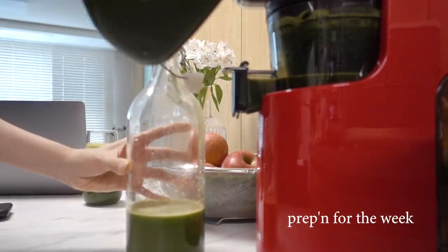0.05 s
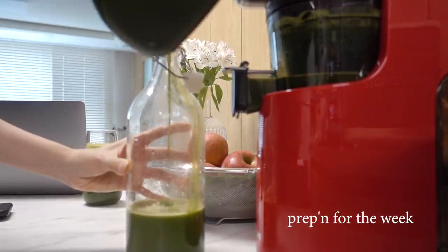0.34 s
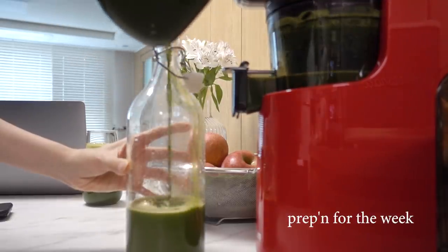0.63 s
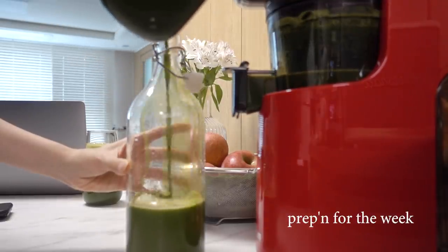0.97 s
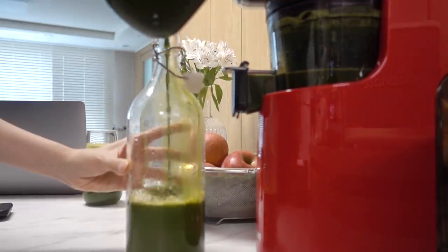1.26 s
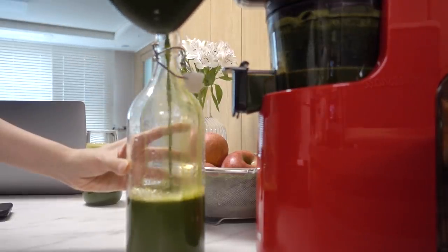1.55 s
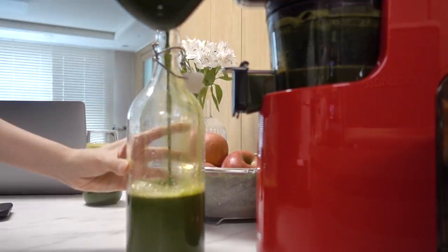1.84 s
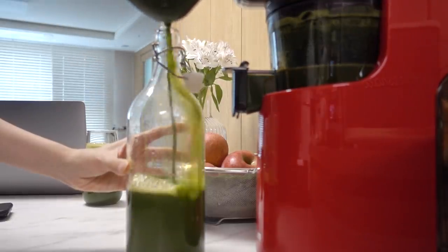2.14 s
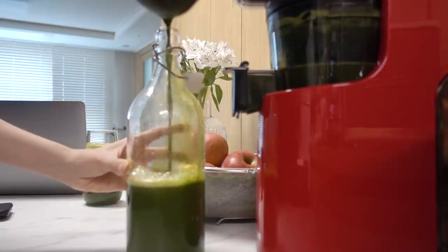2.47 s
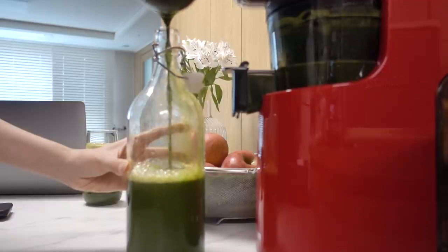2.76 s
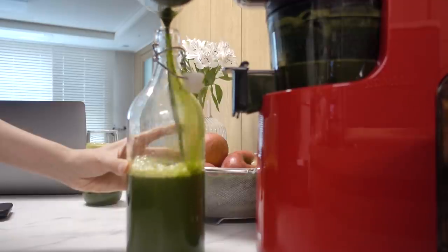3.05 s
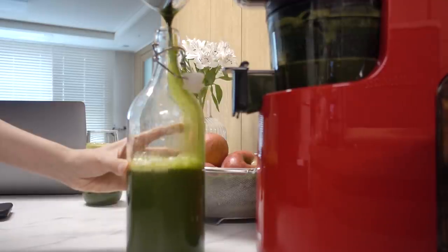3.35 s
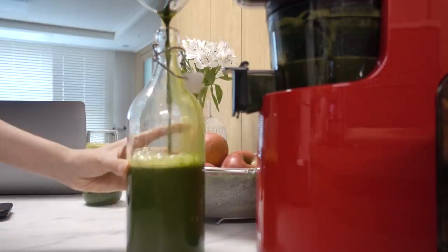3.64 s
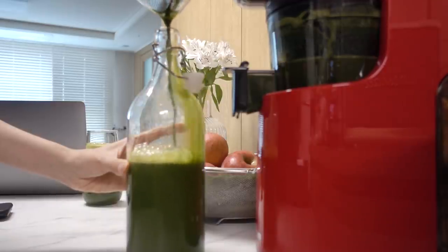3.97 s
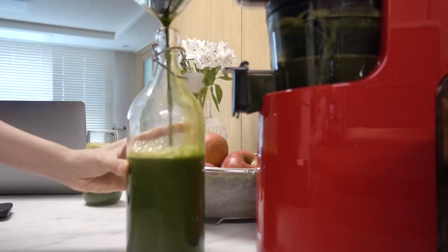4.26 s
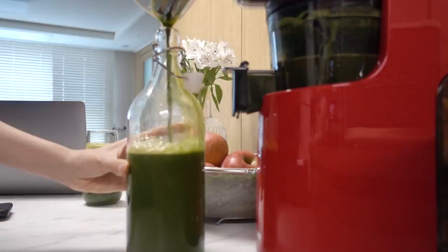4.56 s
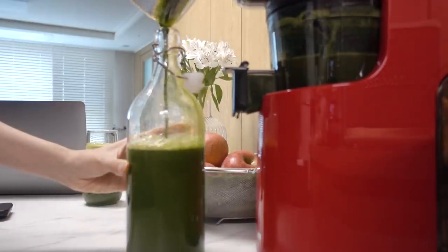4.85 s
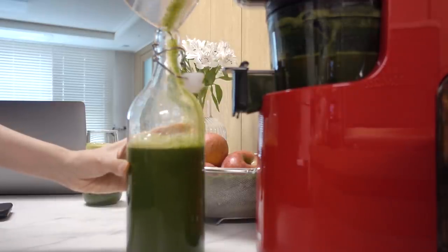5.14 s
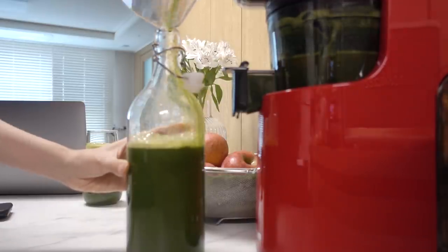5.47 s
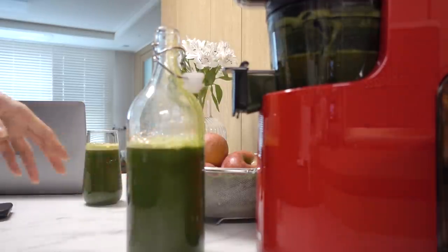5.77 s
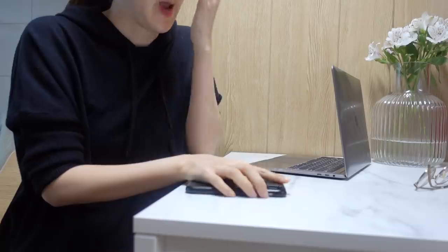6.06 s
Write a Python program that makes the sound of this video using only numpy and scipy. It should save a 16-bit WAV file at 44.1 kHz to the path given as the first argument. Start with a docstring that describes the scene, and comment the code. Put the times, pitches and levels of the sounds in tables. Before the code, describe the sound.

Wet crunching and sharp little snaps come right from the start as a slow juicer crushes leaves and fruit on a kitchen counter, close to the microphone and centred. Small squelches, fine spits of juice and a few dull knocks mix in, over a steady hiss and a motor whine that sags slightly under load. After almost six seconds the sound stops dead, and a faint low bump fades into room tone.

```python
"""Wet, crunching crackle over the buzz and whine of a motor: a slow juicer on a kitchen counter.
The auger grinds leaves and fruit into dense grains that ring the plastic bowl; stalks snap against
the strainer, air pockets squelch out of the pulp, juice spits and hard chunks thud in the housing.
The mains motor sags under the bites, and its cooling air hisses evenly.
Near the end the sound cuts off abruptly, leaving a soft low bump in a quiet room."""
import sys
import numpy as np
from scipy import signal
from scipy.fft import rfft, irfft, next_fast_len
from scipy.io import wavfile
from scipy.ndimage import uniform_filter1d

SR = 44100
rng = np.random.default_rng(int(sys.argv[2]) if len(sys.argv) > 2 else 0)


def store_pcm(level_fs):
    """Save levels as 16-bit WAV."""
    pcm = np.round(np.clip(level_fs, -1, 1) * 32767).astype(np.int16)
    wavfile.write(sys.argv[1], SR, np.atleast_2d(pcm).T)


N = 269454
TIME = np.arange(N) / SR
CUT_S, MAINS_HZ = 5.912, 59.98

# The auger bites into produce. Each row: start in seconds, length in seconds,
# relative level of crushed pulp in dB, relative level of torn leaves in dB.
AUGER_BITES = [(0.08, 0.086, -62, -53), (0.335, 0.15, -43, -46), (0.535, 0.13, -44.5, -47.5),
               (0.761, 0.096, -43, -48), (1.227, 0.022, -45, -46), (1.278, 0.05, -40, -44),
               (1.419, 0.1, -45.5, -51.5), (1.618, 0.018, -37.5, -38.5), (1.911, 0.061, -41.5, -45),
               (2.01, 0.039, -42.5, -39.5), (2.12, 0.025, -47, -43), (2.245, 0.1, -43, -48.5),
               (2.617, 0.1, -45, -53.5), (2.677, 0.1, -52, -56), (2.881, 0.068, -43, -51),
               (3.013, 0.039, -56, -43.5), (3.2, 0.042, -47, -47), (3.28, 0.049, -42, -66),
               (3.459, 0.074, -45.5, -49), (3.587, 0.11, -43, -47), (3.766, 0.052, -52, -47.5),
               (3.889, 0.033, -47, -60), (4.118, 0.14, -48, -49), (4.25, 0.027, -43, -48),
               (4.381, 0.057, -43, -48), (4.566, 0.028, -40, -45), (4.644, 0.02, -38.5, -45),
               (4.74, 0.14, -51.5, -59), (4.905, 0.023, -46, -49), (5.021, 0.04, -49, -53),
               (5.231, 0.018, -52, -41), (5.304, 0.034, -64, -45), (5.44, 0.1, -49, -50.5)]
# The loudest stalks and fruit breaking. Each row: start in seconds, snap level in dB,
# snap centre in Hz, relative knock level in dB, knock centre in Hz.
LOUD_CRACKS = [(0.045, -38.5, 5000, -45, 1400), (0.075, -52, 3830, -33.5, 1400),
               (0.087, -47, 5000, -34.5, 1610), (0.147, -35, 4840, -40, 2330),
               (0.196, -36.5, 4800, -58, 960), (0.293, -34.5, 5740, -47, 2230),
               (0.341, -47, 5000, -39, 1360), (0.374, -41.5, 4920, -40, 1300),
               (0.464, -33, 5100, -34, 2150), (0.484, -31, 5100, -35, 2365),
               (0.505, -35.5, 5000, -47, 2300), (0.527, -46, 5000, -36, 2270),
               (0.538, -35.5, 8540, -50, 2200), (0.547, -38, 5200, -50, 1000),
               (0.576, -41, 5000, -48, 1400), (0.76, -34.5, 11300, -42, 1350),
               (0.769, -37, 5000, -45, 1403), (0.79, -40, 4900, -48, 2400), (0.814, -38, 5000, -39, 1020),
               (0.855, -38, 4820, -40, 1430), (0.872, -36, 4990, -50, 1400), (0.946, -35, 5840, -43, 1339),
               (1.031, -34.5, 6900, -43, 2410), (1.124, -51, 5040, -37, 974),
               (1.227, -34.5, 6820, -55, 1555), (1.243, -47, 4500, -34.5, 2530),
               (1.274, -37, 4970, -44, 1000), (1.291, -39, 4886, -37, 1100), (1.297, -33, 3840, -34, 1390),
               (1.319, -45, 4980, -40, 1030), (1.373, -45, 5000, -36, 1350), (1.445, -48, 4980, -39, 1020),
               (1.459, -34.5, 4930, -52, 1552), (1.556, -36.5, 4960, -42, 1606),
               (1.629, -40, 5260, -43, 1500), (1.636, -38, 5260, -32.5, 1002),
               (1.713, -38.5, 6100, -45, 1403), (1.908, -37, 5980, -34, 1599),
               (1.937, -42, 5190, -39, 1506), (1.965, -36, 4484, -38, 1370), (1.971, -42, 5540, -33, 1980),
               (2.013, -32.5, 4690, -36, 1406), (2.017, -39, 4800, -33, 1390),
               (2.026, -35, 5070, -46, 2300), (2.033, -35, 5010, -45, 969), (2.053, -39, 7400, -35.5, 1023),
               (2.122, -32, 5000, -35, 2420), (2.131, -35, 5170, -42, 1091),
               (2.195, -37.5, 6530, -59, 1400), (2.251, -38, 5020, -38, 1005),
               (2.263, -39, 7000, -48, 1403), (2.272, -37.5, 6990, -46, 1500),
               (2.446, -48, 10970, -34.5, 995), (2.459, -36, 6210, -43, 990), (2.54, -59, 3964, -39, 1258),
               (2.627, -56, 4493, -36.5, 1780), (2.689, -46, 3790, -35, 2180),
               (2.721, -38, 8950, -40, 1027), (2.758, -36.5, 5075, -37, 2500),
               (2.894, -43, 4993, -36.5, 1080), (2.926, -39, 5980, -45, 1407),
               (3.034, -35, 5000, -33.5, 2260), (3.047, -42, 5200, -46, 1400),
               (3.133, -38.5, 6020, -55, 1394), (3.211, -40, 5010, -46, 1397),
               (3.373, -38.5, 5500, -43, 2182), (3.384, -48, 6810, -32.5, 2260),
               (3.488, -34.5, 8050, -50, 2215), (3.517, -34.5, 5810, -40, 2280),
               (3.54, -39, 7000, -41, 1397), (3.599, -42, 8500, -40, 1390), (3.635, -38, 6990, -38.5, 966),
               (3.667, -34, 3570, -36, 2328), (3.767, -32.5, 4900, -37.5, 2710),
               (3.796, -46, 5000, -39, 2720), (3.82, -43, 6030, -51, 1398), (3.909, -56, 4990, -36, 1597),
               (3.972, -34.5, 4944, -42, 1039), (3.977, -34.5, 4924, -36, 1006),
               (4.144, -39.5, 5000, -44, 1605), (4.195, -47, 5500, -50, 1402),
               (4.231, -37.5, 7140, -51, 1000), (4.241, -48, 5060, -38, 1316),
               (4.266, -43, 5000, -40, 1050), (4.336, -33.5, 6490, -43, 998),
               (4.393, -33.5, 4990, -38, 1582), (4.425, -32, 6980, -38, 1606),
               (4.465, -46, 4983, -37.5, 1000), (4.591, -39, 5000, -37.5, 1013),
               (4.617, -43, 4980, -40, 1997), (4.647, -45, 5000, -38, 2426),
               (4.666, -36, 10710, -37.5, 1050), (4.757, -35.5, 5300, -48, 1091),
               (4.837, -41, 7000, -37, 2400), (4.913, -47, 5000, -37.5, 1095),
               (5.021, -35, 7000, -49, 1147), (5.137, -34.5, 7400, -38.5, 1033),
               (5.237, -34.5, 6730, -34, 1359), (5.246, -39.5, 5020, -38, 1060),
               (5.27, -35.5, 6770, -56, 1400), (5.323, -33.5, 5690, -59, 2700),
               (5.337, -34.5, 6750, -62, 2400), (5.348, -34, 5030, -65, 1410),
               (5.362, -39, 5000, -60, 1400), (5.506, -36, 8180, -53, 941), (5.529, -40, 5970, -54, 1397)]
# The loudest air pockets in the pulp. Each row: start in seconds, pitch in Hz, relative level in dB.
LOUD_SQUELCHES = [(0.079, 1660, -34.5), (0.338, 1300, -34), (0.494, 2320, -34), (1.292, 1060, -33.5),
                  (1.63, 1520, -35), (0.694, 1043, -36), (1.038, 1050, -44), (1.604, 1000, -36),
                  (1.734, 1050, -37), (2.957, 1050, -42), (3.99, 1000, -41), (4.81, 1080, -42),
                  (2.049, 1020, -36.5), (2.715, 994, -37), (3.224, 1880, -38.5), (3.31, 2204, -45),
                  (3.377, 2270, -39), (3.51, 2247, -34.5), (3.907, 1590, -35.5), (4.264, 1017, -34.5),
                  (4.585, 1050, -43), (4.915, 2060, -41), (5.234, 1370, -40), (5.78, 1510, -40)]
# Juice spitting through the strainer. Each row: start in seconds, level in dB.
JUICE_SPITS = [(0.132, -49), (0.376, -41), (0.422, -43), (0.446, -41), (0.768, -38.5), (1.29, -39),
               (1.318, -40), (1.598, -44), (1.629, -37.5), (1.936, -38), (1.965, -44), (2.013, -42),
               (2.29, -41.5), (2.72, -38.5), (2.89, -43), (3.158, -42.5), (3.215, -42), (3.486, -43),
               (3.598, -41), (3.634, -40), (4.655, -41), (4.834, -42), (5.235, -40.5), (5.454, -42.5),
               (5.49, -43.5), (5.788, -41), (5.873, -42)]
# Hard chunks shifting against the auger. Each row: start in seconds, level in dB.
CHUNK_THUDS = [(0.088, -54), (1.295, -63), (1.636, -58), (2.252, -59), (2.446, -48), (2.54, -49),
               (3.035, -54), (3.385, -53), (3.636, -48), (5.24, -49.5)]
# The motor sagging and picking up again. Each row: time in seconds, shaft turns per second.
SHAFT_SPEEDS = [(0.02, 228.9), (0.1, 229.4), (0.15, 229.4), (0.24, 228.4), (0.3, 226.7), (0.39, 227.7),
                (0.48, 225), (0.75, 225.4), (0.81, 222.4), (0.96, 227.6), (1.12, 227.2), (1.21, 225.1),
                (1.25, 223.4), (1.35, 222.7), (1.42, 225.8), (1.47, 223.7), (1.69, 229.1), (1.89, 226.5),
                (2.13, 222.9), (2.53, 226.8), (2.62, 227), (2.76, 222), (2.92, 227.3), (3.05, 221.6),
                (3.21, 226.9), (3.35, 222.1), (3.44, 226.3), (3.48, 221.7), (3.58, 225), (3.65, 220.4),
                (3.71, 224.2), (3.79, 221), (3.85, 226.6), (3.97, 221.6), (4.06, 226.7), (4.16, 225.2),
                (4.24, 223.4), (4.33, 224.1), (4.43, 219.7), (4.49, 225.3), (4.54, 226.3), (4.58, 222.6),
                (4.76, 222), (4.87, 226.8), (4.94, 222.3), (5.18, 228.6), (5.27, 224.2), (5.48, 226.7),
                (5.55, 223.8), (5.69, 227.4), (5.82, 228), (5.9, 227.2)]
# The whine: the partials at or near whole multiples of the shaft rate (1, 6, 12, 18, 24, 30, 36) # are fan and
# commutator, the others gears and bearings. # Each row: multiple of the shaft rate, level in dB, dB gained per
# Hz of shaft speed, # dB gained per second, phase flutter at average speed in radians.
WHINE_PARTIALS = [(0.994, -67.5, 0, -0.4, 0.34), (4.573, -59, -0.5, -1, 0.46), (6, -58, 1, -0.5, 0.3),
                  (7.07, -63.5, 0.5, -1.5, 0.27), (10.79, -62.5, -1.5, -1, 0.28),
                  (12.06, -64.5, 0.7, 1.8, .6), (15.815, -55.5, -0.5, 0.4, .8),
                  (18.13, -61, 0.6, -0.5, .25), (22.1, -61.5, -1, -0.5, 0.27), (24.2, -61.5, 1.35, 0.5, .2),
                  (30, -62, 0.6, 2.5, .2), (36.02, -53.5, 0.86, -0.16, .2)]
# The motor's magnetic buzz. Each row: multiple of the mains frequency, level in dB.
BUZZ_HARMONICS = [(16, -61.5), (24, -57.5), (32, -70), (40, -56.5), (48, -72), (56, -56.3)]
# The broad tone of the plastic bowl and housing. Each row: frequency in Hz, gain in dB.
BOWL_EQ = [(30, -39), (70, -26), (150, -24), (210, -15.5), (280, -9.5), (440, -12.5), (510, -9),
           (780, -10.5), (950, -0.2), (1200, -2), (1800, -4), (2300, 0), (2800, -10.5), (3200, -11),
           (7000, -26)]
# The ring of the bowl and housing. Each row: centre in Hz, width in Hz, boost in dB.
BOWL_RESONANCES = [(297.6, 66, 8.8), (394, 11, 1.9), (560, 71, 5.9), (708, 36, 7.3), (1008, 140, 4.7),
                   (1361, 29, 8.7), (1598, 58, 6.9), (2708, 97, 8.4)]
# The bright tone of tearing fibres. Each row: frequency in Hz, gain in dB.
FIBRE_EQ = [(300, -41), (1500, -17.5), (3000, -6), (3900, -4.5), (4400, -4), (4900, -0.5), (6100, -2),
            (7200, -1), (8500, -2.5), (9500, -5), (11200, -10), (12800, -11), (15500, -9.5)]
# The brief ring of the strainer. Each row: centre in Hz, width in Hz, boost in dB.
STRAINER_RESONANCES = [(4560, 91, 6.5), (4910, 130, 2.7), (5340, 120, 3), (7000, 180, 2.4),
                       (11070, 620, 5.9)]
# The sizzle of juice spray. Each row: frequency in Hz, gain in dB.
SPRAY_EQ = [(2000, -38), (6000, -7), (9500, 2), (12500, -1.5), (15500, -6)]
# The dull tone of a thud through the housing. Each row: frequency in Hz, gain in dB.
HOUSING_EQ = [(40, -38), (130, -16), (250, -1), (420, -2), (600, -1), (900, 2), (1500, -13), (4000, -40)]
# The hiss of the cooling air. Each row: frequency in Hz, gain in dB.
FAN_EQ = [(300, -36), (1500, -27.5), (3000, -4), (4900, -3), (8500, -5.5), (11200, -9), (15500, -15)]
# The room tone. Each row: frequency in Hz, gain in dB.
ROOM_EQ = [(18, -46), (30, -10), (92, -19), (167, -9), (195, -13), (222, 0), (260, -27), (437, -15),
           (485, -17), (1920, -19), (15000, -40)]
# The juicer's stereo width. Each row: frequency in Hz, gain of the side signal in dB.
SIDE_EQ = [(100, -38), (1300, -79), (2400, -22.5), (3800, -10), (6000, -13.5), (9500, -14.5), (12000, -6.5),
           (15000, -4.5)]


def crushing():
    """The auger grinds pulp against the strainer; its grains and an even gear rumble ring the bowl."""
    pulp = 0.72 * grains(per_s=200, spread_db=3.5, cap_db=3.5, decay_s=0.0028, click=0.68)
    pockets = np.zeros(N)
    for centre_hz in np.arange(600, 2900, 280):  # wet pockets collapse in flurries, a pitch per size
        flurry = undb(4 * wander(38))
        pops = grains(per_s=90, spread_db=3, cap_db=5, decay_s=0.0051)
        pockets += flurry * band(pops, centre_hz, width_hz=242)
    idle_db = -49 - 0.5 * (TIME - TIME.mean())  # the pulp thins out as the juice drains
    pressure = auger_pressure(idle_db, [(start, length, db) for start, length, db, _ in AUGER_BITES])
    crunch = (pulp + 0.56 * pockets) * pressure * undb(11)
    gear_eq = [(100, -35), (300, -38), (700, -33), (1200, -36.5), (2500, -44)]
    gears = colour(rng.standard_normal(N), gear_eq)
    return colour(crunch + gears, BOWL_EQ, BOWL_RESONANCES) * undb(-1)


def tearing(pressure):
    """Leaf fibres tear against the strainer in short runs of bright, wet crackle."""
    crackle = 0.8 * grains(per_s=150, spread_db=2.6, cap_db=7.5, decay_s=0.0018, click=0.8)
    for centre_hz in (4650, 7400, 9950, 13100):  # fibres of different thickness
        fibres = grains(per_s=100, spread_db=2, cap_db=8, decay_s=0.0025, click=0.7)
        crackle += 1.03 * band(fibres, centre_hz, width_hz=centre_hz / 4)
    sparkle = grains(per_s=70, spread_db=3, cap_db=9, decay_s=0.001, click=1)
    crackle += 0.9 * band(sparkle, centre_hz=12000, width_hz=6000)
    runs = undb(2 * wander(45))
    return unit_rms(colour(runs * crackle, FIBRE_EQ, STRAINER_RESONANCES)) * pressure * undb(2)


def auger_pressure(idle_db, bites):
    """The crackle's envelope: uneven idle grinding that swells with each bite."""
    idle = undb(idle_db + 2 * wander(28))
    bite_power = sum((undb(db) * bite(start, length)) ** 2 for start, length, db in bites)
    return np.sqrt(idle ** 2 + bite_power)


def bite(start, length, attack_s=0.008, release_s=0.025):
    """The pressure of one bite: a quick rise, a hold, a release."""
    since = np.maximum(TIME - start, 0)
    return (1 - np.exp(-since / attack_s)) * np.exp(-np.maximum(since - length, 0) / release_s)


def cracks():
    """Each break is a sharp snap that rings the strainer and a duller knock that rings the bowl."""
    out = np.zeros(N)
    for start, snap_db, snap_hz, knock_db, knock_hz in LOUD_CRACKS + small_cracks():
        snap = burst(decay_s=0.0015, tail_db=-18, tail_s=0.009)
        snap[0] += 3.8  # the break itself arrives before its reflections
        snap_peaks = [(snap_hz, 1600, 7), (4900, 400, 2), (14000, 7000, -3.5)]  # wet pulp dulls the top
        snap = colour(snap, FIBRE_EQ, STRAINER_RESONANCES + snap_peaks)
        knock = burst(decay_s=0.004, tail_db=-16, tail_s=0.016)
        knock[0] += 5
        knock_peaks = [(knock_hz, 260, 8), (400, 600, -4)]  # too light to move the housing much
        knock = colour(knock, BOWL_EQ, BOWL_RESONANCES + knock_peaks)
        add_hit(out, start, snap, snap_db, over_s=0.004)
        add_hit(out, start, knock, knock_db - 2.5, over_s=0.01)
    return out


def small_cracks():
    """Lesser breaks come at random, more often during a bite; rows as in LOUD_CRACKS."""
    per_s = 7 + 14 * sum(bite(start, length) for start, length, *_ in AUGER_BITES)
    count_due = np.cumsum(per_s) / SR
    draws = rng.random((200, 3))
    levels_db = (-45, -51) + 1.8 * rng.uniform(-1.7, 1.7, (200, 2))
    rows = []
    for k, ((jitter, snap_pitch, knock_pitch), (snap_db, knock_db)) in enumerate(zip(draws, levels_db)):
        if k + jitter < count_due[-1]:
            start = np.interp(k + jitter, count_due, TIME)
            snap_hz = np.interp(snap_pitch, (0, 1), (4900, 8250))
            knock_hz = np.interp(knock_pitch, (0, 1), (970, 2480))
            rows.append((start, snap_db, snap_hz, knock_db, knock_hz))
    return rows


def squelches(scatter_octaves=0.11, ring_s=0.0045):
    """Each air pocket squeezed out of the pulp breaks into five short-lived bubbles around its pitch."""
    out, t = np.zeros(N), TIME[:2048]
    envelope = (1 - np.exp(-t / 0.00088)) * np.exp(-t / ring_s)
    for start, pocket_hz, db in LOUD_SQUELCHES + small_squelches():
        for lag, detune, strength in rng.random((5, 3)):
            bubble_hz = pocket_hz * 2 ** (scatter_octaves * (2 * detune - 1))
            cycles = bubble_hz * (t + 0.53 * t ** 2)  # a slight upward chirp
            bubble = envelope * np.sin(2 * np.pi * cycles)
            add(out, start + 0.018 * lag, undb(db + 0.5) * (0.5 + strength) * bubble)
    return out


def small_squelches(per_s=12):
    """Lesser pockets burst at random times and pitches; rows as in LOUD_SQUELCHES."""
    jitter, pitch = rng.random((120, 2)).T
    starts = (np.arange(120) + jitter) / per_s
    pitches_hz = np.interp(pitch, (0, 1), (1100, 2500))
    levels_db = -49 + 1.5 * rng.uniform(-1.7, 1.7, 120)
    return [(start, hz, db) for start, hz, db in zip(starts, pitches_hz, levels_db) if start < CUT_S]


def spits(ticks_per_s=2500):
    """Juice spits through the strainer: tiny films burst in a fine, bright spray that dies away."""
    out, t = np.zeros(N), TIME[:2048]
    envelope = (1 - np.exp(-t / 0.0018)) * np.exp(-t / 0.008)
    for start, db in JUICE_SPITS:
        ticks = (rng.random(len(t)) < ticks_per_s / SR) * rng.standard_normal(len(t))
        hiss = 0.14 * rng.standard_normal(len(t))
        add_hit(out, start, colour((ticks + hiss) * envelope, SPRAY_EQ), db, over_s=0.008)
    return out


def thuds():
    """Hard chunks shift against the auger and thud through the housing."""
    out = np.zeros(N)
    for start, db in CHUNK_THUDS:
        push = burst(decay_s=0.007, tail_db=-18, tail_s=0.02)
        push[0] += 6
        add_hit(out, start, colour(push, HOUSING_EQ, BOWL_RESONANCES), db, over_s=0.015)
    return out


def motor():
    """A rough, wavering whine that follows the shaft, and a magnetic buzz locked to the mains."""
    tremble_hz = 0.45 * wander(40)  # the auger grips and slips
    shaft_hz = uniform_filter1d(curve(SHAFT_SPEEDS), size=1024) + tremble_hz
    turns = np.cumsum(shaft_hz) / SR
    sag_hz = shaft_hz.mean() - shaft_hz
    strain = undb(sag_hz / 2)  # a labouring motor runs rougher
    out = np.zeros(N)
    for order, db, db_per_hz, db_per_s, flutter_rad in WHINE_PARTIALS:
        flutter = flutter_rad * strain * wander(130)  # play in the bearings smears each partial
        level_db = db - db_per_hz * sag_hz + db_per_s * (TIME - TIME.mean()) + 2.2 * wander(28)
        out += undb(level_db) * np.sin(2 * np.pi * order * turns + flutter)
    for order, db in BUZZ_HARMONICS:
        level_db = db + wander(8)
        phase = 2 * np.pi * (order * MAINS_HZ * TIME + rng.random()) + 0.08 * wander(50)
        out += undb(level_db) * np.sin(phase)
    return np.sqrt(2) * out


def fan():
    """The even hiss of the motor's cooling air."""
    return undb(-49.5) * noise(FAN_EQ)


def quiet_room():
    """Low room tone with a little stereo width, and a soft bump that dies away in it."""
    air = undb(-59) * noise(ROOM_EQ)
    side = undb(-71) * noise(ROOM_EQ)
    bump = noise([(20, -9), (50, 5), (100, -13), (170, 1), (300, 5), (450, 0), (700, -5),
                  (1500, -10), (4000, -36.5)])
    bump_db = curve([(5.88, -80), (5.91, -51), (5.945, -51.5), (5.98, -56.5), (6.06, -66)])
    return np.array([air + side, air - side]) + undb(bump_db) * bump


def grains(per_s, spread_db, cap_db, decay_s, click=0):
    """Tiny random breaks of uneven strength, each a dying puff of noise with an optional click."""
    size_db = np.minimum(spread_db * rng.exponential(size=N), cap_db)
    ticks = (rng.random(N) < per_s / SR) * rng.choice([-1, 1], N) * undb(size_db)
    energy = signal.lfilter([1], [1, -np.exp(-2 / (decay_s * SR))], ticks ** 2 + 1e-18)
    puffs = np.sqrt(energy) * rng.standard_normal(N)
    return unit_rms(click * unit_rms(ticks) + unit_rms(puffs))


def burst(decay_s, tail_db, tail_s):
    """A dying scatter of reflections: quick inside the bowl, then a weak tail from the kitchen."""
    t = TIME[:4096]
    return rng.standard_normal(len(t)) * (np.exp(-t / decay_s) + undb(tail_db) * np.exp(-t / tail_s))


def colour(x, eq, resonances=()):
    """Shape a sound with a broad EQ curve (Hz, dB) and peaks or dips (centre Hz, width Hz, dB)."""
    size = 2 * next_fast_len(len(x) // 2 + 2048)
    hz = np.maximum(np.fft.rfftfreq(size, 1 / SR), 1)
    eq_hz, eq_db = np.transpose(eq)
    db = np.interp(np.log(hz), np.log(eq_hz), eq_db)
    for centre, width, peak in resonances:
        db += peak / (1 + (2 * (hz - centre) / width) ** 2)
    cepstrum = irfft(db * np.log(10) / 20)
    cepstrum[1:size // 2] *= 2  # minimum phase, so the ring follows the hit
    cepstrum[size // 2 + 1:] = 0
    return irfft(rfft(x, size) * np.exp(rfft(cepstrum)))[:len(x)]


def band(x, centre_hz, width_hz):
    """One resonance, gain 1 at its centre."""
    return signal.lfilter(*signal.iirpeak(centre_hz, centre_hz / width_hz, fs=SR), x)


def noise(eq):
    """Steady coloured noise with an rms of one."""
    return unit_rms(colour(rng.standard_normal(N), eq))


def wander(per_s):
    """Smooth random modulation with a spread near one."""
    hold = int(SR / per_s)
    steps = np.repeat(rng.standard_normal(N // hold + 1), hold)
    return 1.36 * uniform_filter1d(uniform_filter1d(steps, hold), hold)[:N]


def curve(points):
    """An automation line through (seconds, value) points."""
    return np.interp(TIME, *np.transpose(points))


def add_hit(out, start_s, sound, db, over_s):
    """Mix in a hit with the energy of a level of db held for over_s."""
    add(out, start_s, undb(db) * unit_rms(sound) * np.sqrt(over_s * SR / len(sound)))


def add(out, start_s, sound):
    """Mix a sound in from start_s."""
    start = max(int(start_s * SR), 0)
    out[start:start + len(sound)] += sound[:N - start]


def undb(db):
    """Decibels to gain."""
    return 10 ** (np.asarray(db) / 20)


def unit_rms(x):
    """Scale to an rms of one."""
    return x / np.sqrt(np.mean(x ** 2) + 1e-20)


def scene():
    """The juicer sits centre; crackle all round the bowl and counter reflections widen its treble."""
    tones_and_snaps = motor() + cracks() + spits()
    leaf_bites = [(start, length, db) for start, length, _, db in AUGER_BITES]
    leaf_pressure = auger_pressure(idle_db=-53.5, bites=leaf_bites)
    juicer = tones_and_snaps + crushing() + thuds() + squelches() + tearing(leaf_pressure) + fan()
    reflections = burst(decay_s=0.006, tail_db=-12, tail_s=0.03)
    reflected = signal.fftconvolve(tones_and_snaps, reflections / np.linalg.norm(reflections))[:N]
    side = colour(reflected + tearing(leaf_pressure) + fan(), SIDE_EQ)
    juicer_gate = np.clip((CUT_S - TIME) / 0.009 + 0.5, 0, 1)
    room_gate = np.clip((TIME - CUT_S) / 0.0096 + 1, 0, 1)
    return juicer_gate * np.array([juicer + side, juicer - side]) + room_gate * quiet_room()


def record(dry):
    """A steep low-pass takes off the treble above 15.9 kHz."""
    return signal.sosfilt(signal.ellip(10, 0.2, 75, 15900, fs=SR, output="sos"), dry)


dry = scene()
out = record(dry)
store_pcm(out)
```